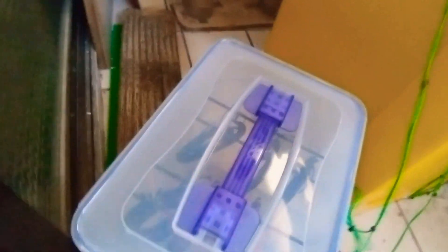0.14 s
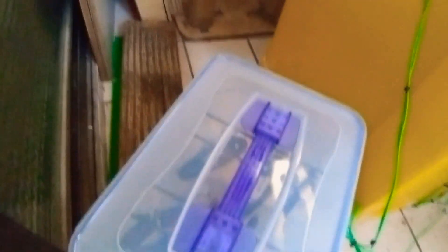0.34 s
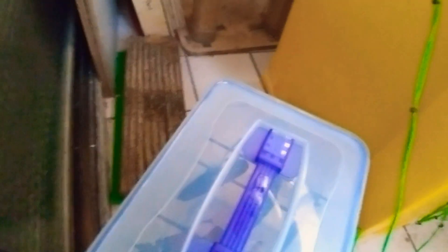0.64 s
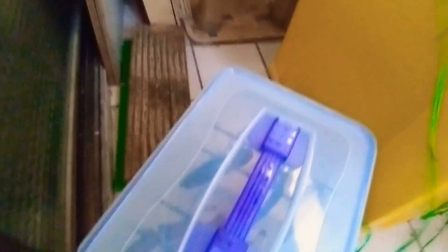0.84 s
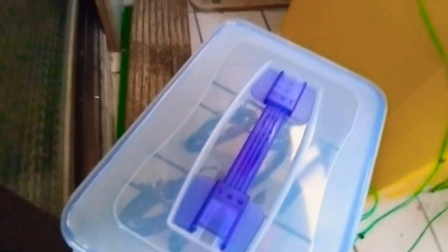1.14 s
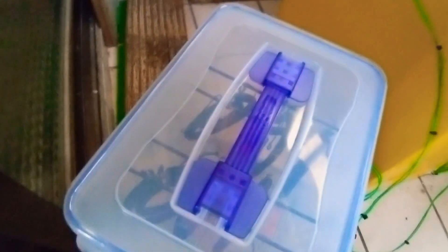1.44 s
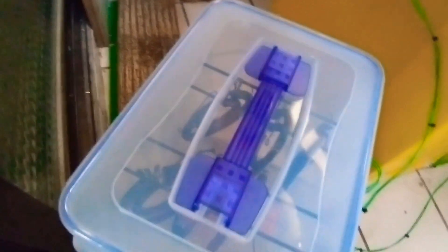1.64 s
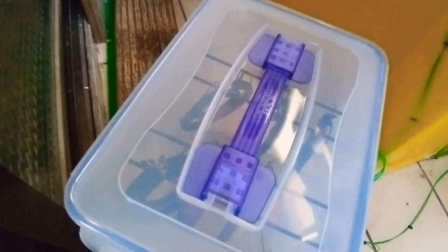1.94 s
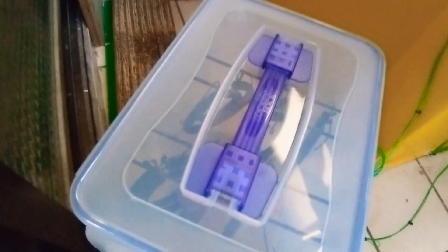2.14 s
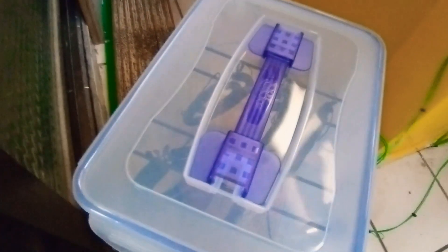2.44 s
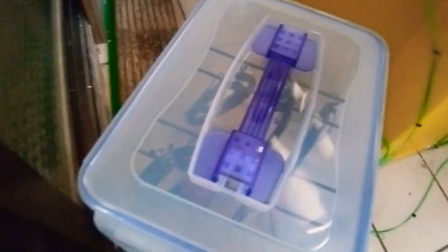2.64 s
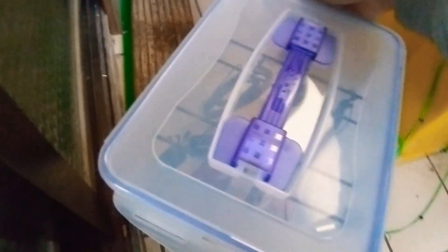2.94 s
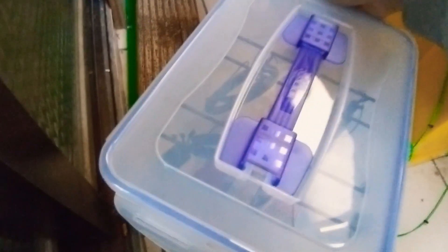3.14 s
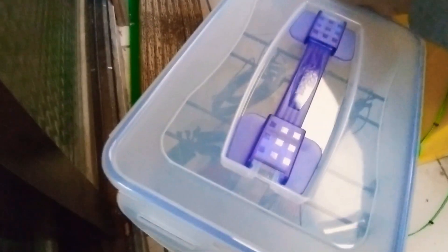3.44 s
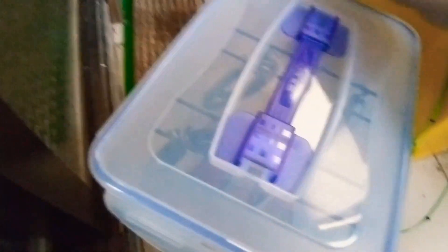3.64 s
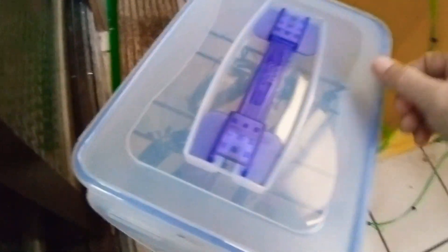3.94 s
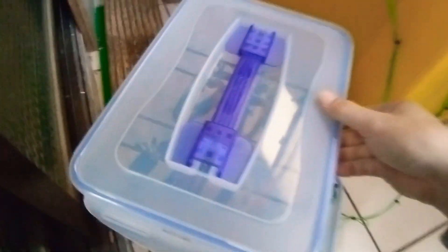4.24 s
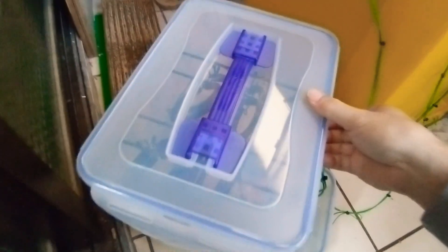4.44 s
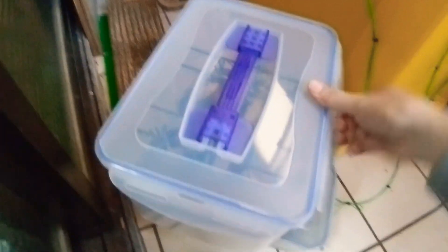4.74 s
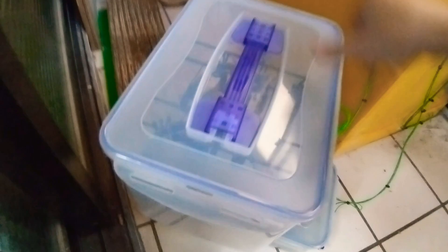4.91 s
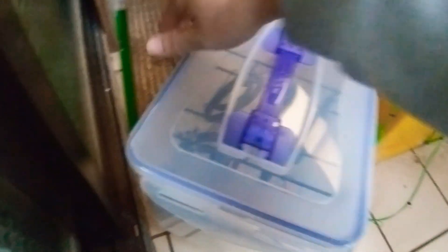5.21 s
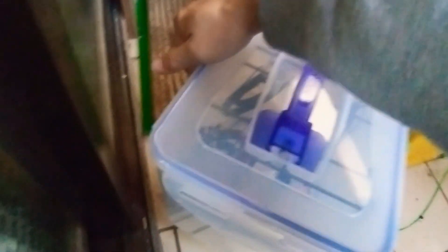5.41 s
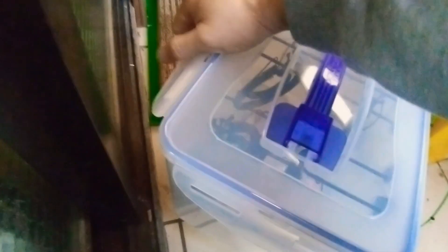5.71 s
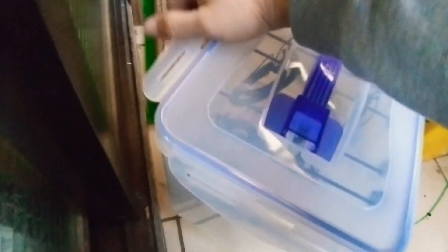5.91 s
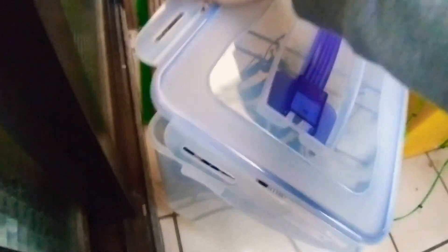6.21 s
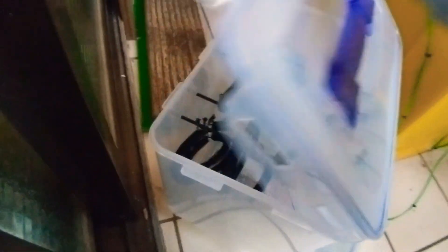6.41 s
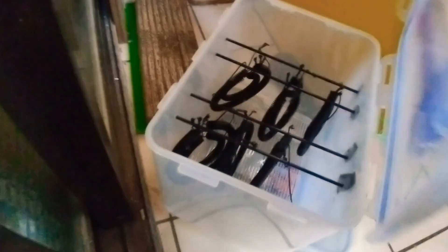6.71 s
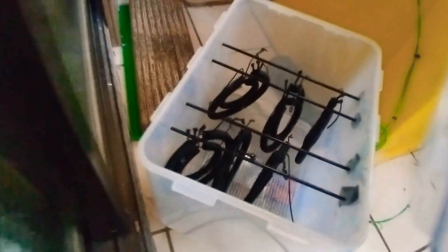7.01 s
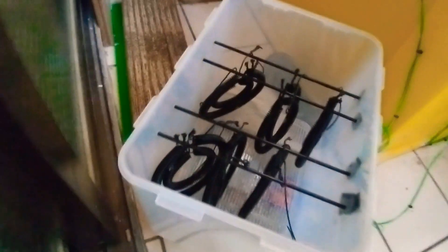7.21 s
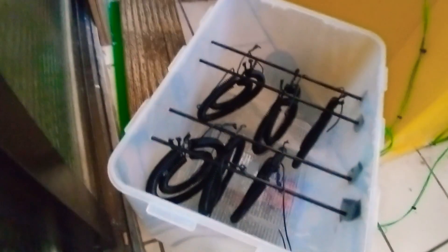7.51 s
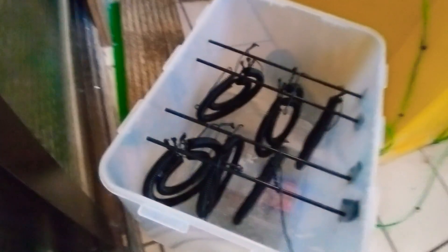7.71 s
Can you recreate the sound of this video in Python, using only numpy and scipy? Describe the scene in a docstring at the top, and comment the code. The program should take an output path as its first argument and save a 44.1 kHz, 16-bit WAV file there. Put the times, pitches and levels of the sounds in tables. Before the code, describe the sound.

Three hollow plastic knocks as box latches snap open, the last two with flap slaps, then the lid is set down with a short chatter.

```python
"""A faint hum and still air in a small room, then bumps and rubs as a hand shifts its grip on a camera.
Three flap latches of a large plastic box on a tiled floor are prised open with a knock and a rattle; the lid
is lifted off and set down on the right, while a sleeve swishes with the arm.
Contacts are noise bursts in four registers, coloured by resonances and echoed by the room; rubs and cloth
are noise in uneven swells; humming, singing and flexing parts are sines."""
import sys
import numpy as np
from scipy import signal
from scipy.fft import rfft, irfft, next_fast_len
from scipy.io import wavfile
from scipy.ndimage import map_coordinates

SR = 44100
rng = np.random.default_rng(int(sys.argv[2]) if len(sys.argv) > 2 else 0)


def unload_wav(signal):
    """Save mono or channel-first audio to the path in sys.argv[1] as 16-bit WAV at rate SR, clipped to [-1, 1]."""
    wavfile.write(
        sys.argv[1],
        SR,
        np.round(np.clip(np.atleast_2d(signal).T, -1, 1) * 32767).astype(np.int16),
    )


N = 346626
TIME = np.arange(N) / SR
TOP_HZ = 16000
SIDES = np.array([[.5], [-.5]])  # half of a lag or level difference goes to each microphone

# Box resonances. Each row: centre in Hz, width in Hz, gain in dB.
BOX_MODES = [(138, 12, 2), (209, 11, 12), (258, 16, 16), (387, 14, 7), (431, 13, 11), (518, 30, 5),
             (583, 24, 2), (795, 50, 3), (961, 30, 4), (1114, 26, 5), (1215, 22, -1), (2700, 120, 5),
             (3560, 110, 5), (3770, 90, 4)]
# Broad colour of the plastic between resonances. Each row: frequency in Hz, gain in dB.
PLASTIC_COLOUR = [(400, 7.5), (1000, 5), (1800, -3), (3000, -6), (5000, -10), (6500, -10.5), (7800, -19.5),
                  (12000, -21), (16000, -26)]


def amp(db):
    """Decibels to gain."""
    return 10 ** (np.asarray(db) / 20)


def unit(x):
    """Scaled to rms 1."""
    return x / np.sqrt(np.mean(x ** 2) + 1e-20)


def colour(points, hz):
    """Gain of (Hz, dB) points on a log-frequency axis."""
    f, db = np.transpose(points)
    return amp(np.interp(np.log(hz + 1), np.log(f), db))


def curves(rows, t):
    """Each column after the first, read at times t."""
    s, *cols = np.transpose(rows)
    return [np.interp(t, s, c) for c in cols]


def sweep(s, half_length_s):
    """Speed of a movement that swells to 1 at time s and dies away."""
    return np.exp(-np.minimum(((TIME - s) / half_length_s) ** 2, 20))


def during(start_s, length_s):
    """Attack, hold and release of a rub."""
    attack_s, release_s = 0.053, 0.039
    t = np.maximum(TIME - start_s, 0)
    attack = 1 - np.exp(-t / attack_s)
    release = np.exp(-np.clip((t - length_s) / release_s, 0, 20))
    return attack * release


def wobble(rate):
    """A smooth random curve, rate knots a second."""
    knots = rng.standard_normal(int(N * rate / SR) + 4)
    return map_coordinates(knots, [TIME * rate])


def wavering(hz, rate):
    """A tone whose phase wanders, rate knots a second."""
    return np.sin(2 * np.pi * hz * TIME + 1.46 * wobble(rate))


def flex(s, hz, peak_db, swell_cycles):
    """A panel swings at its own pitch, peaking after swell_cycles and dying away."""
    cycles = np.maximum(TIME - s, 0) * hz
    swell = np.minimum(cycles / swell_cycles, 20)
    return amp(peak_db) * swell * np.exp(1 - swell) * np.sin(2 * np.pi * cycles)


def patchy(x, swells):
    """Each octave of x swells on its own; swells are (knots a second, depth dB)."""
    out = 0
    for top_hz in TOP_HZ / 2 ** np.arange(7):
        octave = signal.butter(2, (top_hz / 2, top_hz), "band", fs=SR, output="sos")
        swell_db = sum(db * wobble(rate) for rate, db in swells)
        out = out + signal.sosfiltfilt(octave, x) * amp(swell_db)
    return unit(out)


def resonances(modes, hz):
    """Complex response of damped modes (Hz, width Hz, dB)."""
    return sum(amp(db) * 1j * hz * w / (c * c - hz * hz + 1j * hz * w) for c, w, db in modes)


def causal(gain):
    """Minimum-phase response with this gain: it rings only after the blow."""
    cepstrum = irfft(np.log(np.maximum(gain, 1e-6)))
    half = len(cepstrum) // 2
    cepstrum[1:half] *= 2
    cepstrum[half + 1:] = 0
    return np.exp(rfft(cepstrum))


def diffuse(size, shape=np.ones_like):
    """Noise from all sides at two spaced microphones: alike in the bass, unrelated in the treble."""
    spacing_m, sound_speed_m_s = 0.19, 343
    m = next_fast_len(size, True)
    hz = np.fft.rfftfreq(m, 1 / SR)
    turn = np.arccos(np.sinc(2 * hz * spacing_m / sound_speed_m_s)) / 2
    spectra = rfft(rng.standard_normal((2, m))) * shape(hz)
    mid, side = irfft(spectra * [np.cos(turn), np.sin(turn)], m)[:, :size]
    return unit(np.array([mid + side, mid - side]))


def strikes(rows, voice, modes, broad, crack, scatter_db, wet_db, rise_s, spot_db):
    """Each contact is a crack and a dense dying shiver, rung through struck spot, object modes and room.

    Rows: start s, level dB, hardness dB per register from the knock up, ring s, spot Hz.
    Voice: relative dB of thump, knock, clack, snap.
    """
    # The registers thump, knock, clack, snap. Each row: low edge in Hz, high edge in Hz.
    registers = [(125, 350), (350, 1400), (1400, 7000), (7000, 16000)]
    # Decay, thump to snap. Each row: share of ring time, added ring in seconds, room t60 in seconds, room in dB.
    damping = [(0.32, 0.089, 0.71, -5.5), (0.58, 0.02, 0.35, -2), (1, 0.001, 0.24, 2),
               (0.92, 0.001, 0.21, 0.5)]
    # Where contacts lie. Each row: time in seconds, left lag in ms, left minus right in dB.
    place = [(2.5, 0.18, -1), (3.28, 0.066, -0.5), (6.42, 0.03, -1.1), (6.73, 0.21, -0.5),
             (7.1, 0.38, -2.5)]
    spot_width = 0.17  # share of the spot's pitch
    size, lead = 2 ** 14, 2 ** 5  # samples
    t, hz = np.arange(size) / SR, np.fft.rfftfreq(size, 1 / SR)

    body = causal(colour(broad, hz) * np.abs(1 + resonances(modes, hz)))
    bands = []
    for edges_hz in registers:
        band_filter = signal.butter(3, edges_hz, "band", fs=SR, output="sos")
        bands.append(body * signal.sosfreqz(band_filter, hz, fs=SR)[1])
    echoes = [amp(-60 * t / room_t60) * (1 - np.exp(-t / 0.0033)) for _, _, room_t60, _ in damping]
    attack = 1 - np.exp(-(t + 1 / SR) / rise_s)
    centre = np.exp(-2j * np.pi * hz * lead / SR)
    # Refer register levels to 20 ms of rms; fade the last tenth of the buffer.
    spread = np.sqrt(.02 * SR / size) * np.minimum(1, 10 * (1 - t / t[-1]))

    out = np.zeros((2, N + size))
    for s, level_db, hardness_db, ring_s, spot_hz in rows:
        spot = 1 + resonances([(spot_hz, spot_width * spot_hz, spot_db)], hz)
        levels_db = level_db + np.array(voice) + hardness_db * (np.arange(len(registers)) - 1)
        lag_ms, pan_db = curves(place, s)
        ports = centre * np.exp(-2j * np.pi * hz * lag_ms / 1000 * SIDES)
        shiver, walls, room = rng.standard_normal(size), diffuse(size), diffuse(size)
        contact = np.zeros((2, size))
        for db, band, echo, (share, added_s, _, room_db) in zip(levels_db, bands, echoes, damping):
            fade = amp(-60 * t / (ring_s * share + added_s)) * attack
            direct = unit(shiver * fade) + crack * unit(t == 0)
            near = amp(scatter_db) * unit(walls * fade)  # object's walls radiate in all directions
            tail = amp(room_db + wet_db) * unit(room * echo)
            spectrum = rfft(direct) * ports + rfft(near + tail) * centre
            contact += amp(db) * unit(irfft(spectrum * band))
        start = round(s * SR) - lead
        out[:, start:start + size] += spread * amp(pan_db * SIDES) * irfft(rfft(contact) * spot)
    return out[:, :N]


def room_tone():
    """Still air as diffuse noise, a faint appliance hum as tones of wandering phase."""
    # Hum partials. Each row: frequency in Hz, rms level in dB.
    hum_partials = [(59.5, -68), (140, -64)]
    # Spectrum of the air. Each row: frequency in Hz, relative gain in dB.
    air_colour = [(20, -27.5), (64, -2.5), (92, -13.5), (179, -15), (242, -24), (720, -28.5), (1540, -44),
                  (16000, -52)]
    air_db = -56
    hum = sum(amp(db) * unit(wavering(hz, 1.89)) for hz, db in hum_partials)
    return hum + amp(air_db) * diffuse(N, lambda hz: colour(air_colour, hz))


def grip():
    """Fingers bump the camera case; skin drags over it in tiny slips, droning at the case's modes."""
    # Bumps. Each row: start in seconds, level in dB, hardness in dB per register, ring in seconds, spot in Hz.
    bump_rows = [(.153, -43.5, 4, 0.42, 2500), (.187, -37.5, -13.5, 0.11, 232),
                 (.206, -38, -3.5, 0.067, 179), (.251, -39, -7.5, 0.028, 1060), (.475, -40, -6, 0.064, 190),
                 (.846, -34, -7.5, 0.032, 490), (.86, -42, -18.5, 0.095, 205),
                 (.956, -37.5, -9.5, 0.34, 560), (1.024, -43.5, -1, 0.023, 149),
                 (1.938, -39.5, -9.5, 0.29, 460), (2.218, -48.5, 3, 0.063, 2020),
                 (2.284, -41.5, 1, 0.044, 1150), (2.514, -53, 2, 1, 1030)]
    # Relative level in dB of thump, knock, clack, snap.
    voice = (-3, -1, -1, -6.5)
    # Case resonances. Each row: centre in Hz, width in Hz, gain in dB.
    case_modes = [(141.4, 13.7, 13.1), (168.7, 39, 9.4), (205, 18, 9.5), (250, 8.9, 2)]
    # Broad colour of skin on the case. Each row: frequency in Hz, gain in dB.
    skin_colour = [(250, 4.5), (500, -4.5), (1600, -9), (2500, -12), (3100, -14), (8000, -20.5),
                   (16000, -20.5)]
    # Rubs. Each row: start in seconds, length in seconds, drone in dB, scrape in dB.
    rubs = [(0.06, 0.032, -34, -37.5), (0.105, 0.37, -46, -57), (0.373, 0.35, -58, -56.5),
            (0.806, 0.14, -39, -41), (1.82, 0.23, -46, -46.5), (1.992, 0.29, -37.5, -47.5),
            (2.495, 0.067, -40.5, -49), (3.407, 0.073, -47, -47)]
    out = strikes(bump_rows, voice, case_modes, skin_colour,
                  crack=1.0, scatter_db=8.0, wet_db=6.5, rise_s=0.00054, spot_db=0.0)
    # Case gain counts twice in the drone.
    drone = unit(sum(amp(2 * db + 3 * wobble(22)) * wavering(hz, width) for hz, width, db in case_modes))
    slips = diffuse(N, lambda hz: colour(skin_colour, hz)) * amp(3 * wobble(800))
    scrape = patchy(slips, [(28, 2.3), (150, 2.8)])
    for s, length_s, drone_db, scrape_db in rubs:
        out += during(s, length_s) * (amp(drone_db) * drone + amp(scrape_db) * scrape)
    return out


def sleeve():
    """Cloth noise swells with the arm; fast-sliding weave sings at its thread rate, lesser folds alongside."""
    # Arm sweeps. Each row: fastest at seconds, half length in seconds, level in dB.
    arm_sweeps = [(0.65, 0.23, -59.5), (2.476, 0.25, -58.5), (3.93, 0.11, -59), (4.415, 0.38, -55),
                  (5.373, 0.28, -56), (5.96, 0.25, -53.5), (6.91, 0.58, -60)]
    # Spectrum of the rustle. Each row: frequency in Hz, relative gain in dB.
    cloth_colour = [(300, 21.5), (750, 16.5), (1600, 3), (4300, 0), (6500, 0), (8500, -4.5), (11500, 0.5),
                    (16000, -19.5)]
    # Weave slides. Each row: fastest at seconds, half length in seconds, nominal thread rate in Hz, level in dB.
    weave_slides = [(0.425, 0.05, 11800, -68), (3.945, 0.085, 11100, -64), (7.025, 0.055, 11200, -66),
                    (7.375, 0.045, 11050, -70)]
    pitch_sag = 0.22  # share of pitch lost as speed falls to zero
    fold_ratios, fold_scatter_s, lesser_fold_db = np.linspace(.62, 1.3, 7), .04, -11

    motion = sum(amp(db) * sweep(s, half_s) for s, half_s, db in arm_sweeps)
    rustle = patchy(diffuse(N, lambda hz: colour(cloth_colour, hz)), [(7, 1.5), (60, 1.5)])
    out = motion * rustle
    folds = [(1, 0.0014, 0)]  # pitch ratio, delay s, dB
    folds += [(ratio, rng.normal(0, fold_scatter_s), lesser_fold_db) for ratio in fold_ratios]
    for ratio, delay_s, fold_db in folds:
        weave = ratio * (1 + .013 * wobble(900) + .008 * wobble(25))
        pressure = amp(fold_db + 2.9 * wobble(42))  # folds touch and part
        for s, half_s, thread_hz, db in weave_slides:
            speed = sweep(s + delay_s, half_s)
            pitch_hz = thread_hz * weave * (1 - pitch_sag * (1 - speed))
            tone = np.sin(2 * np.pi * np.cumsum(pitch_hz) / SR)
            out += amp(db) * speed * pressure * tone * rng.uniform(0.37, 1, (2, 1))
    return out


def taps():
    """Soft touches of fingers and lid stir all but the box's highest modes."""
    # Each row: start in seconds, level in dB, hardness in dB per register, ring in seconds, spot in Hz.
    tap_rows = [(2.887, -46, -7, 0.73, 183), (3.023, -49.5, -13.5, 0.26, 173),
                (3.055, -56.5, -1, 0.12, 1700), (3.225, -43, -6.5, 0.17, 193), (3.3, -41, -6, 0.046, 253),
                (3.786, -44, -9.5, 0.051, 594), (3.817, -39, -4.5, 0.06, 850),
                (3.833, -46, -1.5, 0.011, 467), (4.09, -41.5, -4.5, 0.2, 615),
                (4.127, -49.5, -2, 0.18, 3600), (4.162, -53, -0.5, .04, 840), (5.311, -53, -0.5, 0.46, 900),
                (5.426, -41, -3, 0.77, 684), (6.218, -53, -12.5, 0.35, 142),
                (6.245, -50.5, -10.5, 0.13, 735), (6.357, -48.5, -7, 1, 285),
                (6.512, -54.5, -8.5, 0.088, 265), (6.524, -53.5, 5, 0.22, 820)]
    # Relative level in dB of thump, knock, clack, snap.
    voice = (-3.5, -0.5, -4.5, -12.5)
    return strikes(tap_rows, voice, BOX_MODES[:-3], PLASTIC_COLOUR,
                   crack=0.35, scatter_db=2, wet_db=-1, rise_s=0.00017, spot_db=9.5)


def flaps():
    """Loose flaps click on the rim, stirring damped modes; after a hard slap their stiff modes sing on."""
    # Clicks. Each row: start in seconds, level in dB, hardness in dB per register, ring in seconds, spot in Hz.
    click_rows = [(3.139, -43, -3.5, 0.025, 6300), (3.398, -48.5, 1.5, 0.021, 1970),
                  (4.36, -46.5, 1.5, 0.093, 5460), (4.379, -47, 1, 0.044, 624),
                  (4.684, -55.5, -2, 0.036, 1590), (4.81, -47.5, 1, 0.15, 653),
                  (5.466, -42.5, 1, 0.075, 740), (5.519, -46, -6.5, 0.04, 780),
                  (6.411, -43.5, -6.5, 0.086, 940), (6.725, -43, 0, 0.022, 1080)]
    # Slaps of a flap swinging home. Each row: as for clicks, then singing in dB.
    slap_rows = [(4.582, -32.5, -5, 0.043, 1430, -28), (5.648, -30, -4.5, 0.098, 2730, -25),
                 (5.676, -35, 0, 0.025, 1150, -31.5), (6.424, -37.5, -3.5, 0.03, 940, -34.5)]
    # Relative level in dB of thump, knock, clack, snap.
    voice = (-3, 2, 1.5, -8.5)
    # Flap resonances. Each row: centre in Hz, width in Hz, gain in dB.
    flap_modes = [(700, 60, 0), (990, 130, 1), (1170, 70, 2), (1570, 130, 2), (3220, 200, 1)]
    # Singing stiff modes. Each row: frequency in Hz, relative level in dB, t60 in seconds.
    stiff_modes = [(1170, -2, .11), (3590, -3, .12), (3760, -1.5, .11), (6090, -7, .06)]
    sing_attack_s, waver_rate = .0015, 120  # waver in knots a second

    out = strikes(click_rows, voice, flap_modes, PLASTIC_COLOUR,
                  crack=0.28, scatter_db=13.5, wet_db=6.5, rise_s=0.000095, spot_db=6.5)
    out += strikes([row[:-1] for row in slap_rows], voice, flap_modes, PLASTIC_COLOUR,
                   crack=0.25, scatter_db=-2.5, wet_db=-8.5, rise_s=0.0017, spot_db=1.5)
    ages = [(np.clip(TIME - s, 0, 1), sing_db) for s, *_, sing_db in slap_rows]
    for hz, db, t60 in stiff_modes:
        ring = sum(amp(db + sing_db - 60 * t / t60) * (1 - np.exp(-t / sing_attack_s)) for t, sing_db in ages)
        out += ring * np.array([wavering(hz, waver_rate), wavering(hz, waver_rate)])
    return out


def latches():
    """Each latch slips, lets go and the lid rebounds, ringing the box; the freed lid pushes the air once."""
    # Each row: release in seconds, level in dB, hardness in dB per register, ring in seconds, spot in Hz,
    # push peak in dB, cycles until the push peaks.
    latch_rows = [(3.276, -23.5, -3, 0.042, 250, -12, 1.15), (4.565, -20, 3.5, 0.1, 470, -5, 0.4),
                  (5.623, -17, -0.5, 0.14, 224, -14.5, .7)]
    # Slip, release, rebound. Each row: delay in seconds, then thump, knock, clack and snap in dB.
    stages = [(-.008, -19, -16.5, -32, -51), (0, -1, 0.5, -10, -21.5), (.0065, -1.5, -7.5, -13, -27.5)]
    out = np.zeros((2, N))
    for delay_s, *voice in stages:
        blows = [(s + delay_s, *blow) for s, *blow, _, _ in latch_rows]
        out += strikes(blows, voice, BOX_MODES, PLASTIC_COLOUR,
                       crack=0.57, scatter_db=3.5, wet_db=-2.0, rise_s=0.0016, spot_db=-20.5)
    for s, *_, spot_hz, push_db, cycles in latch_rows:
        out += flex(s, spot_hz, push_db, cycles)
    return out


def lid():
    """The lid lands with its panel ringing, its stiff flaps chatter, and it flexes as it is let go."""
    # Landing. Each row: start in seconds, level in dB, hardness in dB per register, ring in seconds, spot in Hz.
    landing_rows = [(7.074, -48.5, 9.5, 0.05, 3300), (7.079, -42, -18.5, 0.047, 158),
                    (7.085, -36, 5, 0.13, 430), (7.286, -52, -10, 0.051, 530), (7.299, -43, -11, 0.1, 645),
                    (7.339, -37.5, -7.5, 0.012, 700), (7.61, -47, -0.5, 0.18, 605)]
    # Chatter. Each row: start in seconds, level in dB, hardness in dB per register, spot in Hz.
    chatter_rows = [(7.137, -48.5, 5, 4320), (7.204, -53.5, 2, 1890), (7.236, -56.5, 7.5, 2230),
                    (7.247, -54, 3.5, 2010), (7.256, -56, 3.5, 2100), (7.267, -50, 1, 2050)]
    # Relative level in dB of thump, knock, clack, snap, landing then chatter.
    landing_voice = (-13.5, -2.5, -7.5, -29.5)
    chatter_voice = (2, 0, 4, -3)
    # Two panel modes, then two flap modes. Each row: centre in Hz, width in Hz, gain in dB.
    lid_modes = [(430, 15, -1), (3300, 1300, -4.5), (2070, 510, 8.5), (4400, 350, 4)]
    chatter_ring_s = 0.013

    landing = strikes(landing_rows, landing_voice, lid_modes[:2], PLASTIC_COLOUR,
                      crack=0.69, scatter_db=13.5, wet_db=5, rise_s=0.00017, spot_db=0.0)
    ticks = [(s, db, hardness_db, chatter_ring_s, spot_hz) for s, db, hardness_db, spot_hz in chatter_rows]
    chatter = strikes(ticks, chatter_voice, lid_modes[2:], PLASTIC_COLOUR,
                      crack=0.5, scatter_db=3.5, wet_db=-5.5, rise_s=0.0002, spot_db=5.0)
    return landing + chatter + flex(7.613, hz=253, peak_db=-39, swell_cycles=4)


def scene():
    """Everything at the two microphones."""
    return room_tone() + grip() + sleeve() + taps() + flaps() + latches() + lid()


def record(dry):
    """The camera keeps nothing above its band limit."""
    m = next_fast_len(N + SR // 2, True)
    passband = np.fft.rfftfreq(m, 1 / SR) < TOP_HZ
    return irfft(rfft(dry, m) * passband, m)[:, :N]


dry = scene()
out = record(dry)
unload_wav(out)
```